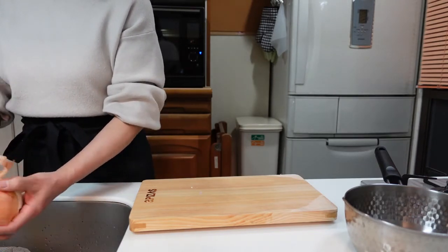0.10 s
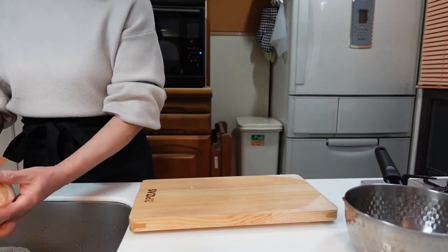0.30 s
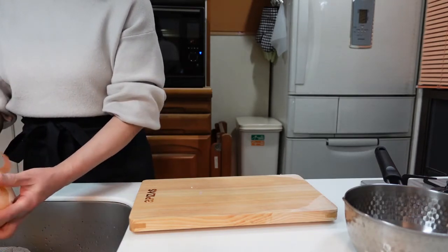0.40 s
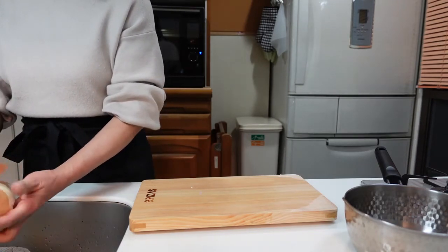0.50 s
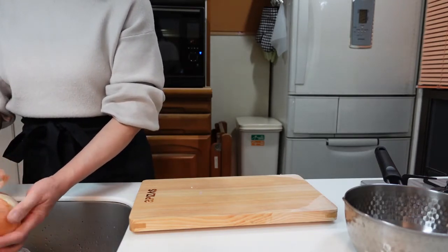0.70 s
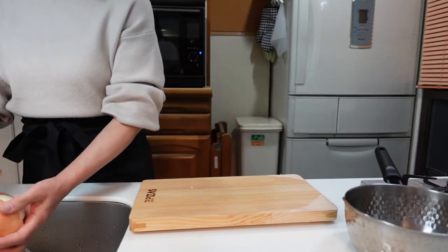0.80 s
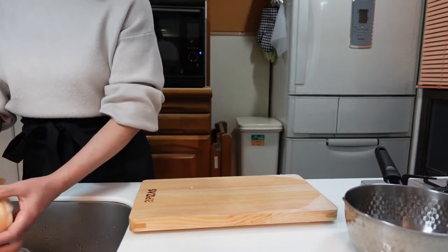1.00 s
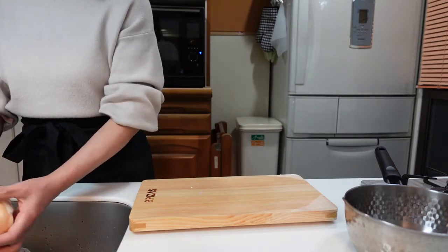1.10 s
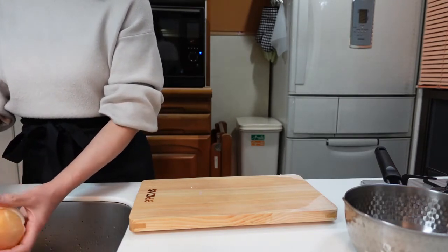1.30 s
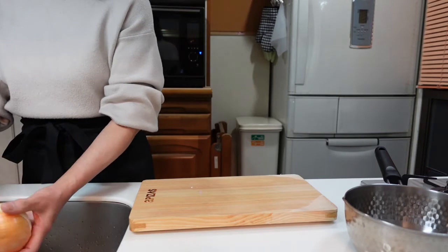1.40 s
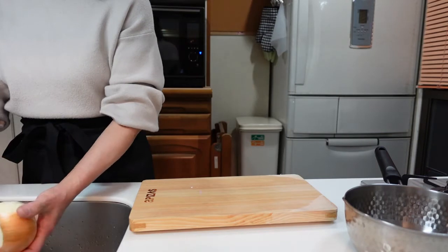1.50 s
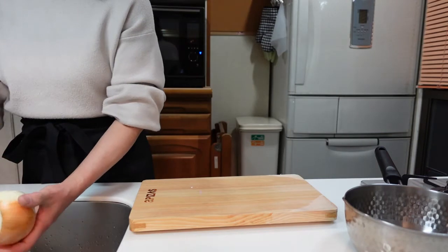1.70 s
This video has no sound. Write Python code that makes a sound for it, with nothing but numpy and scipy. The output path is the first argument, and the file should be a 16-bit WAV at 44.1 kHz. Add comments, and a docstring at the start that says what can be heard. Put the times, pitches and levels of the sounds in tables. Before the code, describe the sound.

Papery onion skin being peeled, with crisp snaps and short crackling tears over a faint appliance drone

```python
"""A low appliance drone, then fingers rubbing dry onion skin that is peeled by hand over a steel sink.
The skin snaps, and rips in short runs of tiny fractures; torn sheets ring briefly.
Later it also lifts off with a fine crackle, and fingers bump the bulb with dull thuds of damped noise.
Each fracture is a click shaped by its flake and scattered by the hands; steel and the small kitchen answer.
The drone is steady noise, shaped in frequency and more alike left and right in the bass."""
import sys
import numpy as np
from scipy import signal
from scipy.io import wavfile

SR = 44100
rng = np.random.default_rng(int(sys.argv[2]) if len(sys.argv) > 2 else 0)


def bounce(signal):
    """Save signal as a 16-bit WAV file at the path given by the first command-line argument."""
    frames = np.transpose(np.atleast_2d(signal))
    limited = np.clip(frames, -1, 1)
    pcm = np.round(limited * 32767).astype(np.int16)
    wavfile.write(sys.argv[1], SR, pcm)


N = 77175  # length in samples

LEVEL_SPAN_S = 0.0024  # the level of a snap or knock is its energy averaged over this time


def amp(db):
    """Decibels to gain."""
    return 10 ** (np.asarray(db) / 20)


def unit(x):
    """Scales to a mean energy of one per channel."""
    return x / np.sqrt(np.mean(np.sum(x ** 2, -1)) + 1e-20)


def read(points, hz):
    """Reads a table on a log-frequency axis."""
    f, value = np.transpose(points)
    return np.interp(np.log(hz + 1), np.log(f), value)


def add(mix, s, sound):
    """Mixes a sound in at a time in seconds."""
    part = mix[:, max(round(s * SR), 0):][:, :sound.shape[1]]
    part += sound[:, :part.shape[1]]


def drone():
    """Low, steady noise of a kitchen appliance, shaped by random phases and sizes in each band."""
    # spectrum of the drone, before its overall level is set: pitch_hz, relative level_db (per Hz)
    drone_spectrum = [(50, -17.5), (78, -5), (120, -5), (172, 4), (290, -1.5), (420, -10.5), (600, -18),
                      (800, -10.5), (1200, -19.5), (3000, -23), (8000, -23.5), (16000, -35)]
    # left-right likeness of the drone: pitch_hz, likeness (0 to 1)
    drone_likeness = [(100, 1), (250, 0.95), (600, 0.49), (3000, 0.19)]
    level_db = -56
    hz = np.fft.rfftfreq(4096, 1 / SR)
    a, b, c, d = rng.standard_normal((4, len(hz), N // 1024 + 5))
    left, other = a + 1j * b, c + 1j * d
    same = read(drone_likeness, hz)[:, None]
    right = same * left + np.sqrt(1 - same ** 2) * other
    bands = np.array([left, right]) * amp(read(drone_spectrum, hz)[:, None])
    noise = signal.istft(bands, nperseg=4096, noverlap=3072)[1][:, :N]
    return amp(level_db) * np.sqrt(N) * unit(noise)


def pair(size):
    """Left and right noise, nearly alike in the bass and less so in the treble."""
    apart_low, apart_high, apart_hz = 0.28, 0.45, 7000  # side gain below and above a gentle crossover
    mid, side = rng.standard_normal((2, size))
    treble = signal.sosfilt(signal.butter(1, apart_hz, "high", fs=SR, output="sos"), side)
    side = apart_low * (side - treble) + apart_high * treble
    return np.array([mid + side, mid - side])


def flake(pitch_hz, tilt, body_db, scatter_t60):
    """One fracture: a flake radiates from its lowest resonance up, and the hands scatter the click."""
    # colour of the dry skin: pitch_hz, relative level_db
    skin_colour = [(100, -26.5), (300, -8.5), (600, -16), (1100, -6), (2000, 2), (4000, 4.5), (6500, 5),
                   (10500, 0.5), (16000, -8)]
    resonance_db, resonance_octaves = 4, 0.1  # height and width of the lowest resonance
    scatter_db = 3  # reflections off the hands and the onion
    taps = 2048
    hz = np.fft.rfftfreq(taps, 1 / SR)
    octaves = np.log2((hz + 20) / pitch_hz)
    # below its resonance the flake radiates only its body share
    radiated = amp(body_db) + (1 - amp(body_db)) / (1 + np.exp(-(octaves + 0.13) / 0.17))
    resonance = resonance_db * np.exp(-(octaves / resonance_octaves) ** 2)
    db = read(skin_colour, hz) + tilt * np.maximum(octaves, -1) + resonance
    log_gain = np.log(np.maximum(amp(db) * radiated, 1e-5))
    # minimum phase: the click starts at once and all its ringing follows
    mirrored = np.r_[log_gain, log_gain[-2:0:-1]]
    click = np.fft.ifft(np.exp(np.conj(signal.hilbert(mirrored)))).real
    t = np.arange(taps) / SR
    scatter = amp(scatter_db) * unit(pair(taps) * amp(-60 * t / scatter_t60))
    scatter[:, 0] += 1  # direct sound
    return signal.fftconvolve(click[None, :taps // 2], scatter, axes=1)


def fractures(rows, per_s, spread_db, attack, release, count=6):
    """Runs of tiny fractures of uneven size, shared among flakes of slightly different pitch.

    Attack and release are shares of a run; the release is centred on the run's stated end."""
    spread_octaves = 0.14  # pitch range of the flakes in one run
    scatter_t60 = 0.051  # s
    out = np.zeros((2, N))
    for s, length, db, hz, tilt, body_db in rows:
        t = np.arange(0, 2 * length, 1 / SR)
        chance, size, sign, spot = rng.random((4, len(t)))
        rise, fall = t / length / attack, (1 - t / length) / release + .5
        swell = np.clip(np.minimum(rise, fall), 0, 1)
        sizes = amp(-spread_db * np.log(size + 0.014))  # mostly small, a few large
        clicks = (chance < per_s / SR) * np.sign(sign - .5) * sizes * swell
        pitches = hz * 2 ** (spread_octaves * np.linspace(-.5, .5, count))
        run = 0
        for k, pitch in enumerate(pitches):
            own_clicks = clicks * (np.floor(spot * count) == k)
            run = run + signal.fftconvolve([own_clicks], flake(pitch, tilt, body_db, scatter_t60), axes=1)
        add(out, s, amp(db) * np.sqrt(length * SR) * unit(run))
    return out


def rubs():
    """Fingers slide on the skin: fractures so dense and uneven that they blur into a rustle."""
    # finger strokes: start_s, length_s, level_db
    strokes = [(0.031, .11, -54.5), (0.153, 0.031, -49.5), (0.692, 0.032, -58), (0.763, 0.11, -51),
               (0.85, 0.093, -46.5), (1.002, 0.08, -52.5), (1.704, 0.058, -50)]
    pitch_hz, tilt, body_db = 3730, -2.2, -14.5  # flake pitch, brightness (dB per octave), body below it
    rows = [(*stroke, pitch_hz, tilt, body_db) for stroke in strokes]
    return fractures(rows, per_s=21000, spread_db=6, attack=0.33, release=0.098)


def steel(x):
    """Steel nearby, the sink and a bowl, rings faintly in sympathy as decaying sines."""
    # modes of the steel: pitch_hz, level_db, t60_s
    steel_modes = [(3715, -23.5, 0.28), (11000, -36, 0.21)]
    t = np.arange(SR // 3) / SR
    ring = np.zeros(len(t))
    for hz, db, t60 in steel_modes:
        ring += amp(db) * unit(np.sin(2 * np.pi * hz * t) * amp(-60 * t / t60))
    return signal.fftconvolve(x, ring[None], axes=1)[:, :N]


def kitchen(x, count=4):
    """A short diffuse tail whose treble dies first; its pattern keeps shifting among a few noise tails."""
    # reverberation of the room: pitch_hz, t60_s
    room_decay = [(200, 0.85), (1300, 0.3), (9000, 0.21), (16000, 0.16)]
    level_db, build_up_s, shift_s = -4, 0.0068, 0.009
    out, turn = np.zeros((2, N)), np.arange(N) / SR / shift_s
    for k in range(count):
        hz, t, bands = signal.stft(pair(SR // 2), SR, nperseg=256)
        decay = amp(-60 * t / read(room_decay, hz)[:, None])
        tail = signal.istft(bands * decay, SR, nperseg=256)[1]
        tail = tail * np.minimum(np.arange(tail.shape[1]) / SR / build_up_s, 1)
        # each tail takes its turn, crossfading with its neighbours
        share = np.sin(np.pi / 2 * np.minimum((turn - k) % count, 2))
        out += signal.fftconvolve(x * share, unit(tail), axes=1)[:, :N]
    return amp(level_db) * out


def snaps():
    """Each snap is one large fracture that dies away quickly."""
    # single cracks of a flake: start_s, level_db, pitch_hz, brightness (dB per octave)
    cracks = [(.066, -43, 4300, -5), (0.1125, -43, 4050, -7.5), (.1755, -35, 4100, -7),
              (0.1969, -24.5, 2830, -5.5), (0.5249, -23.5, 3350, -5), (0.6267, -36, 3930, -9.5),
              (0.761, -41.5, 1990, -.5), (1.0769, -27.5, 3960, -3.5), (1.1554, -27, 4350, -9),
              (1.1625, -30.5, 4430, 11), (1.1686, -25.5, 4630, -4.5), (1.259, -45, 5500, 0),
              (1.609, -35.5, 3970, 6)]
    out = np.zeros((2, N))
    for s, db, hz, tilt in cracks:
        crack = flake(hz, tilt, body_db=-19, scatter_t60=0.032)
        add(out, s, amp(db) * np.sqrt(LEVEL_SPAN_S * SR) * unit(crack))
    return out


def rips():
    """The skin tears in short bursts of fractures of nearly even size."""
    # tears: start_s, length_s, level_db, pitch_hz, brightness (dB per octave), body_db (below the pitch)
    tears = [(.218, 0.0059, -30.5, 3100, 2, -3), (.279, 0.0076, -27, 3410, 0, -4.5),
             (.300, 0.0078, -34.5, 2950, -.5, -3.5), (.390, 0.021, -26, 3870, -0.5, -10.5),
             (.405, 0.054, -31.5, 3060, -1, -4), (.425, 0.0036, -24, 3700, -1.5, -19),
             (.437, 0.0025, -27.5, 3300, -7, -9.5), (.496, 0.0064, -26, 3380, -4, -7),
             (.505, 0.012, -20.5, 3190, -3.5, -15), (.528, 0.015, -22, 3280, 3.5, -1),
             (.552, 0.0068, -21.5, 5430, -0.5, -17), (1.078, 0.0022, -23, 4130, -5, -32),
             (1.156, 0.0054, -26, 4700, 1.5, -9), (1.243, 0.0091, -26.5, 5900, -1.5, -12.5),
             (1.293, 0.0081, -22.5, 4150, 1, -3), (1.305, 0.0044, -24, 4200, -6.5, -16),
             (1.316, 0.0024, -21.5, 4520, 8.5, 7.5), (1.325, 0.0084, -31, 4220, -5.5, -10),
             (1.340, 0.005, -19.5, 4400, 5, -1.5), (1.377, 0.0025, -25.5, 4530, 8.5, 6),
             (1.393, 0.0081, -30.5, 3650, 3.5, -4), (1.421, 0.012, -24, 4700, 2.5, -3.5),
             (1.487, 0.0058, -23, 3500, -0.5, -6.5), (1.562, 0.012, -33.5, 3660, 1, -2),
             (1.701, 0.005, -36, 4670, 1, -9.5)]
    return fractures(tears, per_s=3200, spread_db=1, attack=.22, release=.8)


def sheets():
    """A freed sheet of skin swells into one short ring as it tears, a decaying sine."""
    # rings: start_s, pitch_hz, level_db, t60_s
    sheet_rings = [(.392, 1732, -45, .24), (.506, 3705, -20.5, 0.079)]
    out, t = np.zeros((2, N)), np.arange(SR // 4) / SR
    swell = np.minimum(t / 0.0024, 1)  # rise time in seconds
    for s, hz, db, t60 in sheet_rings:
        ring = swell * amp(db - 60 * t / t60) * np.sin(2 * np.pi * hz * t)
        add(out, s, ring[None])
    return out


def peels():
    """The skin lifts off slowly: sparser fractures make a fine crackle."""
    # lifts: start_s, length_s, level_db, pitch_hz, brightness (dB per octave), body_db (below the pitch)
    lifts = [(1.085, 0.064, -45.5, 4150, -1.5, -7.5), (1.18, 0.053, -36.5, 3650, 0, -4),
             (1.25, 0.069, -35.5, 3800, 3, 5), (1.35, 0.15, -42, 4470, 0.5, -3),
             (1.53, 0.12, -48, 3570, 4, 11.5)]
    return fractures(lifts, per_s=600, spread_db=1.5, attack=0.051, release=0.19)


def knocks():
    """The fingers bump the firm bulb: a dull, quickly damped thud of band-passed noise."""
    # bumps: start_s, level_db
    bumps = [(1.092, -47), (1.305, -39), (1.424, -42), (1.491, -49.5)]
    band_hz, t60 = (250, 1600), 0.088  # t60 in s
    out, t = np.zeros((2, N)), np.arange(SR // 8) / SR
    dull = signal.butter(2, band_hz, "band", fs=SR, output="sos")
    for s, db in bumps:
        thud = signal.sosfilt(dull, pair(len(t)) * amp(-60 * t / t60))
        add(out, s, amp(db) * np.sqrt(LEVEL_SPAN_S * SR) * unit(thud))
    return out


def scene():
    """The onion, a little to the left, in the kitchen."""
    left_db = 0.62  # left is raised and right lowered by this
    skin = rubs() + snaps() + rips() + sheets() + peels() + knocks()
    skin = skin * amp([[left_db], [-left_db]])
    return drone() + skin + steel(skin) + kitchen(skin)


def record(dry):
    """A low cut, then a steep treble limit."""
    low_cut_hz, edge_hz = 82, 15900
    cut = signal.sosfilt(signal.butter(2, low_cut_hz, "high", fs=SR, output="sos"), dry)
    band_limit = signal.firwin(511, edge_hz, window=("kaiser", 9), fs=SR)
    return signal.oaconvolve(cut, band_limit[None], "same")


dry = scene()
out = record(dry)
bounce(out)
```